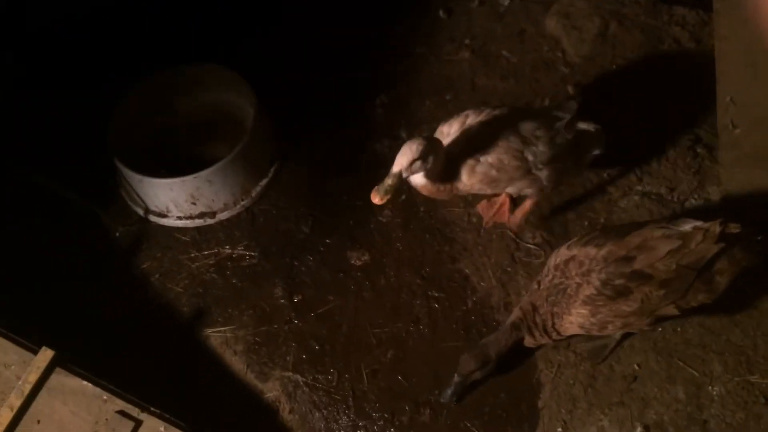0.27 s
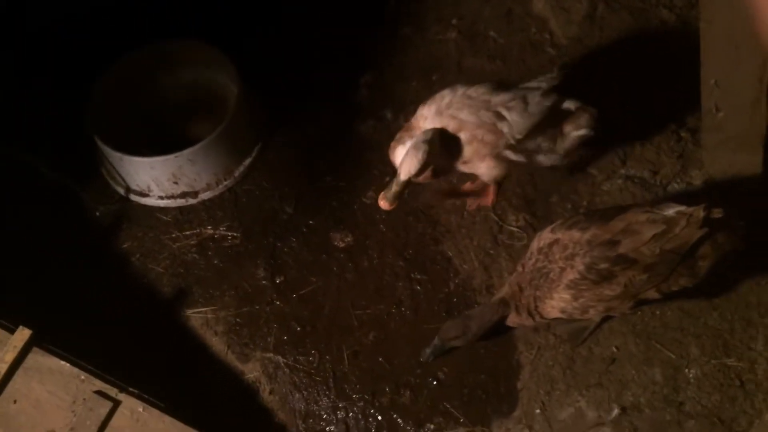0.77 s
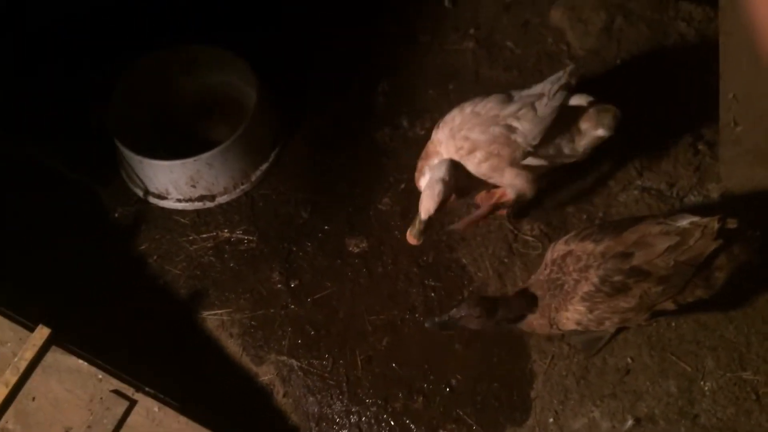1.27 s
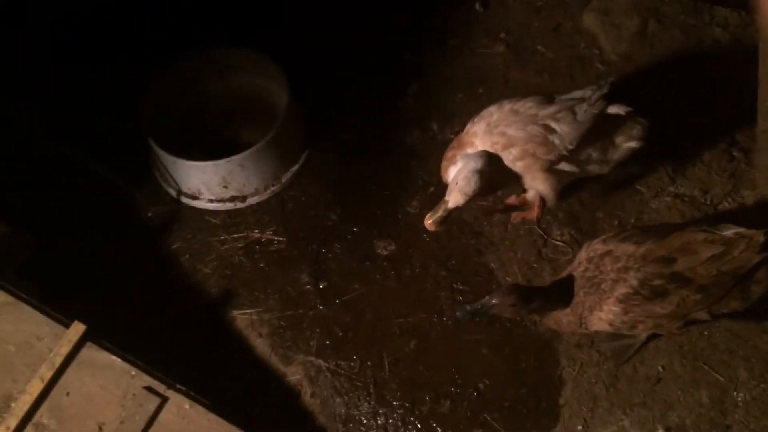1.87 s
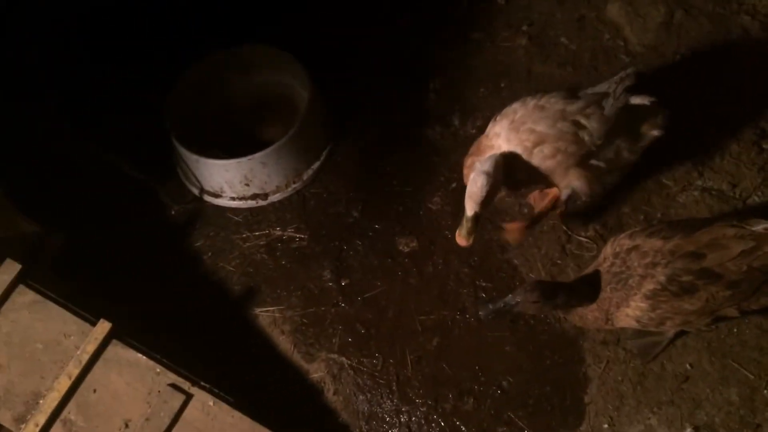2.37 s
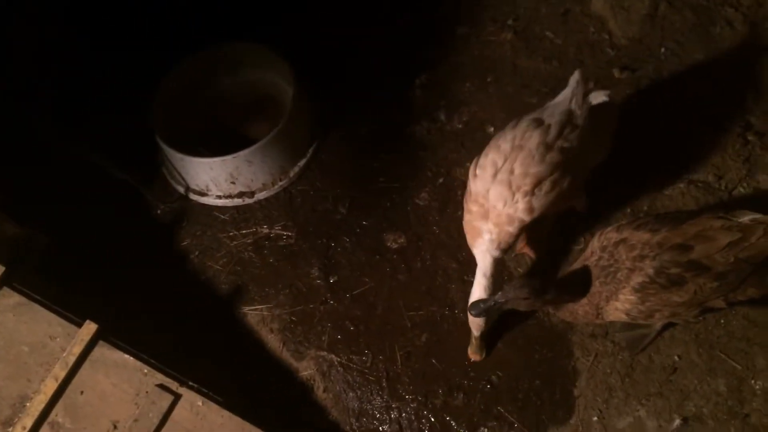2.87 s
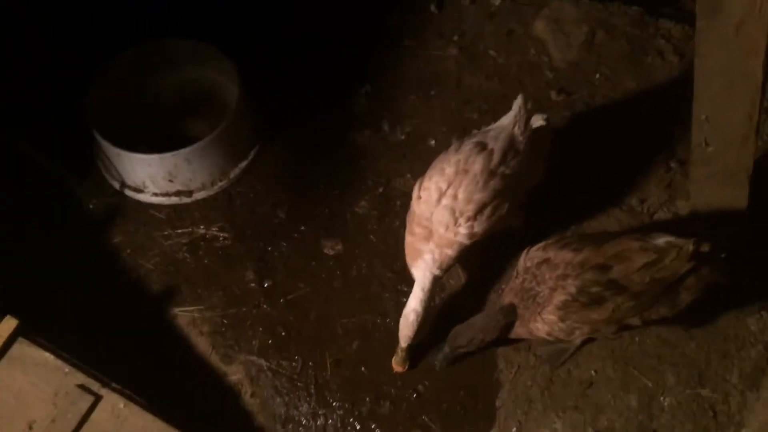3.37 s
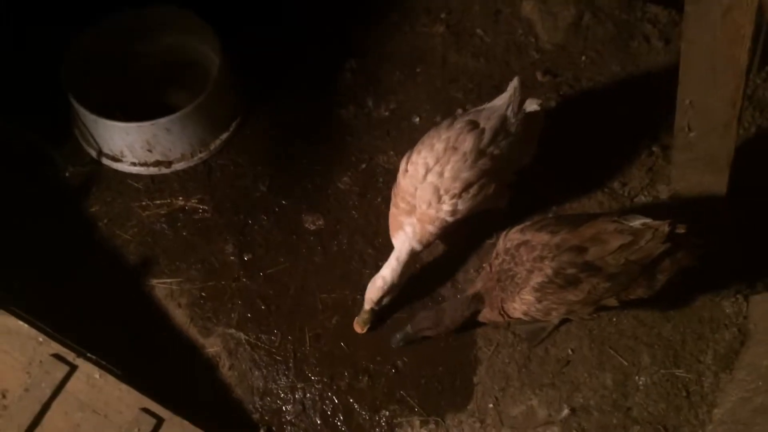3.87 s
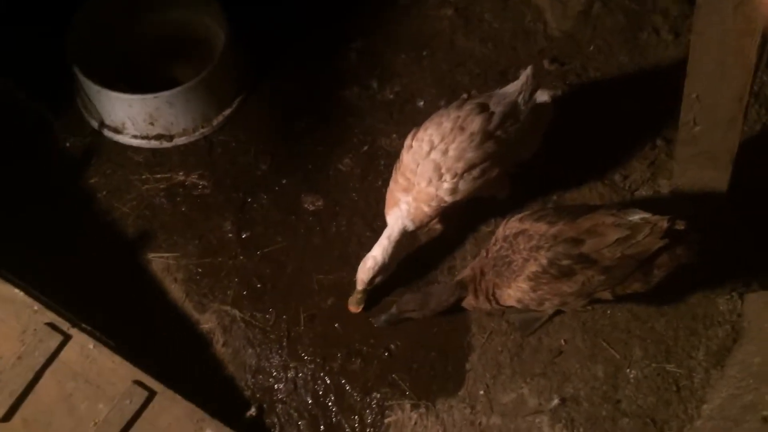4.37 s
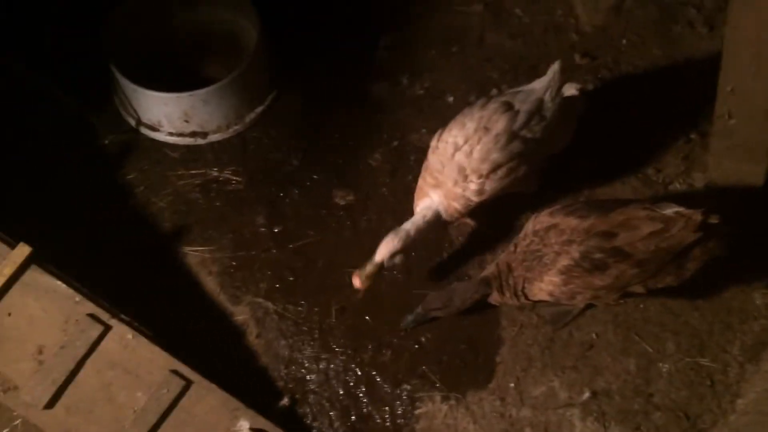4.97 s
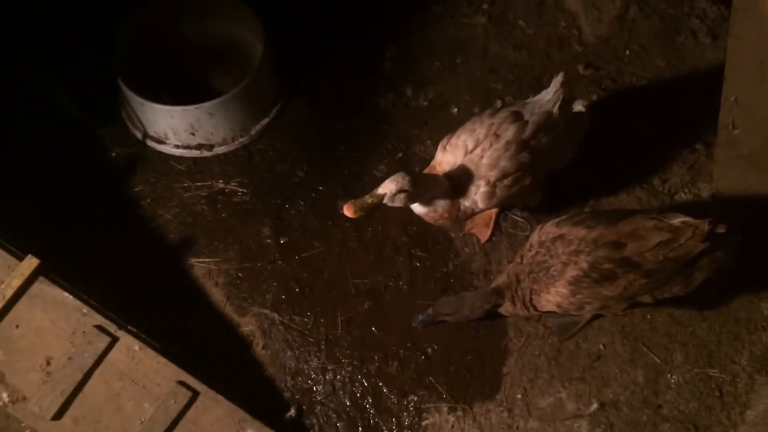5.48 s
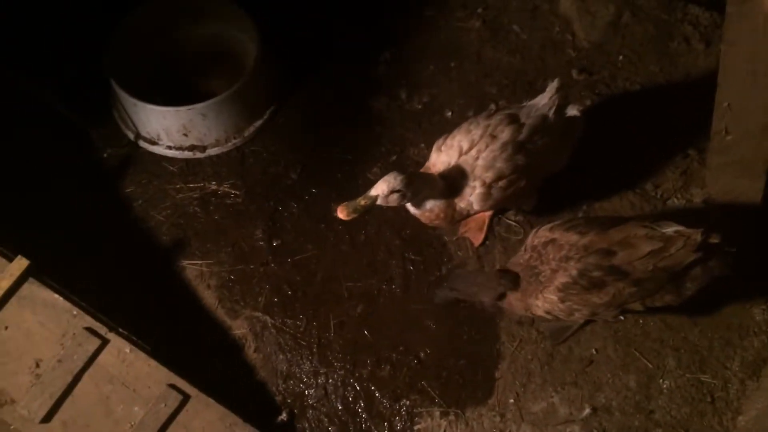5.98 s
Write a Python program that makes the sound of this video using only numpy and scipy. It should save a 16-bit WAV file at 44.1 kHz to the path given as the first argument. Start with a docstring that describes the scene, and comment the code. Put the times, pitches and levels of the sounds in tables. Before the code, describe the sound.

Quick wet bill clicks and fizzing water, a lull with two knocking duck clucks and faint whines, then louder, splashier dabbling.

```python
"""Coop floor at night: two ducks dabble in a shallow puddle.
Bills pop, snap and spray as decaying bursts; sips are narrow hisses with a rising whistle.
Stirred water is a crowd of tiny bubbles, louder the harder it is stirred.
Between two bouts: low clucks and a low plop or footstep from ringing modes, and thin gliding whines.
Background: shaped noise for rumble and hiss, plus wavering sine lines for a quiet hum."""
import sys
import numpy as np
from scipy import signal
from scipy.fft import rfft, irfft
from scipy.io import wavfile
from scipy.ndimage import map_coordinates

SR = 44100
rng = np.random.default_rng(int(sys.argv[2]) if len(sys.argv) > 2 else 0)


def file_out(sig):
    """Save sig as 16-bit WAV at sys.argv[1]."""
    # one column per channel
    cols = np.atleast_2d(sig).T
    # limit, then scale
    lim = np.clip(cols, -1, 1)
    pcm = np.round(lim * 32767).astype(np.int16)
    wavfile.write(sys.argv[1], SR, pcm)


N = 275170

# clear bill clicks in water: start_s, pop_hz, pop_db, snap_db, spray_db
BILL_CLICKS = [(0.0762, 2020, -66, -50, -58), (0.1445, 1690, -54, -63, -64),
               (0.3759, 2450, -52, -58.5, -51), (0.459, 1950, -53.5, -78, -52.5),
               (0.5354, 2640, -43, -52, -62), (0.6235, 2200, -40.5, -67, -69),
               (0.7209, 1790, -56.5, -55.5, -56), (0.7458, 1970, -39.5, -63, -63),
               (0.7824, 1080, -47, -52.5, -56), (0.7954, 2300, -35.5, -73, -73),
               (0.8226, 1920, -48, -71, -53), (0.9107, 2330, -36.5, -44.5, -54),
               (0.9647, 1920, -48, -50, -55), (0.9763, 2330, -49, -70, -70),
               (0.9976, 2200, -41.5, -61, -55), (1.0309, 1250, -52, -60, -61),
               (1.0365, 2610, -43, -69, -64), (1.0604, 2240, -46, -66, -70),
               (1.0778, 1750, -39, -47.5, -77), (1.1197, 1920, -46, -62, -60),
               (1.1403, 2420, -66, -47, -83), (1.176, 2680, -53, -53, -51), (1.215, 2270, -58, -56, -58),
               (1.8817, 2440, -59, -56, -51), (2.028, 2380, -58.5, -69, -56),
               (2.4724, 1690, -60, -69, -56.5), (3.1387, 1310, -62, -54.5, -78),
               (3.4387, 2730, -56.5, -65, -65), (3.596, 2120, -49, -57.5, -82),
               (3.784, 2600, -54, -60, -63), (3.8014, 1690, -53, -59, -73), (3.881, 2050, -51, -59, -82),
               (3.9676, 2450, -49, -52.5, -89), (4.0398, 2000, -46.5, -52.5, -74),
               (4.128, 2480, -38.5, -36.5, -41.5), (4.1525, 2230, -42.5, -48.5, -66),
               (4.1866, 2200, -45, -44, -68), (4.213, 2430, -46.5, -58, -73), (4.2194, 2240, -44, -53, -69),
               (4.2263, 2210, -58, -52.5, -45), (4.2613, 2500, -43.5, -52, -65),
               (4.2956, 2360, -44.5, -58, -58), (4.3612, 2220, -32, -46, -62),
               (4.3922, 2490, -40, -60, -43), (4.457, 2050, -42, -53.5, -53),
               (4.531, 2480, -43.5, -42, -55), (4.5944, 2000, -39.5, -54.5, -60),
               (4.662, 1810, -40.5, -43.5, -46.5), (4.694, 1450, -51, -56, -74),
               (4.7268, 2620, -46, -54, -46), (4.7873, 1650, -34.5, -40, -55),
               (4.8162, 1510, -37, -67, -74), (4.8252, 1780, -39.5, -68, -51),
               (4.8582, 2750, -43, -70, -75), (4.887, 2080, -37, -53, -44.5),
               (4.918, 2600, -52, -53.5, -58), (4.9747, 2380, -42.5, -65, -49),
               (5.0116, 1830, -32.5, -54, -49), (5.0343, 1620, -43.5, -39.5, -38.5),
               (5.0908, 2250, -32.5, -50, -76), (5.117, 1300, -36, -55, -46),
               (5.1381, 1350, -37.5, -51, -39), (5.143, 2090, -36.5, -43.5, -75),
               (5.1808, 2900, -40, -46, -37), (5.2323, 2650, -52, -49.5, -65),
               (5.2552, 1400, -44, -54, -46), (5.3183, 2000, -53.5, -44.5, -43),
               (5.3765, 2280, -59, -44, -45), (5.4268, 1790, -43.5, -69, -42),
               (5.4321, 2430, -37.5, -46, -73), (5.4817, 1700, -35.5, -66, -61),
               (5.4871, 2330, -41.5, -43, -30), (5.5434, 1840, -45, -41.5, -45.5),
               (5.5978, 1450, -32.5, -76, -69), (5.671, 1830, -69, -62, -56),
               (5.749, 1920, -52, -61, -58.5), (5.8376, 1910, -48.5, -78, -76),
               (5.8632, 2080, -53, -74, -54)]
# water squeezed through the bill: start_s, resonance_hz, level_db (before sip trim)
BILL_SIPS = [(0.051, 2070, -61), (0.953, 1320, -52), (1.029, 1200, -51), (1.082, 4340, -48),
             (1.272, 2290, -59.5), (1.479, 2610, -57.5), (1.591, 2410, -54.5), (1.819, 2310, -58.5),
             (1.957, 2326, -56), (2.104, 2420, -59), (2.244, 2470, -66), (2.506, 2410, -60),
             (2.873, 3170, -61), (3.065, 2550, -59), (3.278, 2620, -55.5), (3.508, 2160, -55),
             (3.582, 1895, -48.5), (4.051, 2970, -52), (4.051, 4500, -55), (4.105, 2180, -58),
             (4.262, 4650, -50.5), (5.572, 1930, -50), (5.709, 2054, -48.5), (6.001, 2630, -48.5)]
# clucking pulses, and last a low plop or footstep played by the same ringing modes:
# start_s, upper_hz, upper_db, upper_t60_s, lower_hz, lower_db (upper: throat, lower: chest in a cluck)
CLUCKS_AND_PLOP = [(2.3701, 1440, -21, 0.0057, 200, -37), (2.3751, 1290, -34.5, 0.016, 188, -38),
                   (2.9208, 1213, -18, 0.015, 267, -28.5), (2.9282, 1230, -17, 0.012, 262, -33.5),
                   (3.6318, 666, -34, 0.0083, 302, -52)]
# whining calls, one curve each: time_s, pitch_hz, level_db, harshness_db
WHINE_CURVES = [
    [(2.525, 670, -57, 7), (2.547, 833, -51, 5), (2.585, 668, -64, -4)],
    [(3.05, 1020, -60, 9), (3.075, 1130, -49.5, -9), (3.115, 904, -60.5, 0), (3.14, 891, -63, -1),
     (3.155, 736, -49.5, -9), (3.18, 804, -48, -10), (3.205, 730, -44, -12), (3.225, 860, -53.5, 4),
     (3.255, 598, -61.5, 10), (3.28, 727, -46, 3), (3.297, 860, -56.5, 8)],
    [(3.058, 1276, -58, -2), (3.082, 1317, -56, -12), (3.135, 1150, -61, 1)],
]
# whine overtones: pitch_multiple, relative_db (before harshness)
WHINE_OVERTONES = [(2, -22), (3, -27), (4, -25)]
# how hard the puddle is stirred: time_s, level_db (reference for nibbles, slosh and fizz)
STIRRING_CURVE = [(0.0, -62.5), (0.52, -67), (0.8, -65.5), (0.97, -58), (1.22, -68), (2.64, -72.5),
                  (3.93, -61), (4.24, -58), (4.57, -58), (5.04, -55.5), (5.13, -51), (5.23, -58),
                  (5.53, -60), (5.67, -59.5), (5.98, -66.5), (6.24, -67)]
# breaking film spectrum: freq_hz, shape_db
SNAP_SPECTRUM = [(1500, -36), (3000, 2), (4500, 5.5), (6000, 6.5), (7200, 15), (9000, -4), (16000, -36)]
# droplet spray spectrum: freq_hz, shape_db
SPRAY_SPECTRUM = [(3000, -70), (7000, -1.5), (9000, 2.5), (11000, -3), (13500, 1), (15200, -3),
                  (16500, 6.5)]
# background rumble and hiss spectrum: freq_hz, shape_db
AIR_SPECTRUM = [(13, -47), (22, -22), (64, 1.5), (90, -2), (165, -8), (211, -10.5), (319, -12.5),
                (750, -18.5), (1230, -18.5), (2320, -31.5), (3810, -42.5), (5610, -36), (8260, -38.5),
                (14700, -37), (16000, -35.5)]
# hum strength: time_s, level_db (before hum trim)
HUM_CURVE = [(0.0, -63.5), (1.25, -60.5), (1.65, -54), (2.5, -65.5), (3.38, -53.5), (3.62, -68.5),
             (5.15, -58.5), (6.24, -63.5)]
# hum lines: freq_hz, relative_db
HUM_TONES = [(85.3, 4), (104.6, -1.5), (63.5, -23)]
# decay of the coop's short answer: freq_hz, t60_s
COOP_DECAY = [(200, 0.14), (1500, 0.059), (5000, 0.053), (14000, 0.029)]
# upper modes, a cluck's throat: upper_pitch_multiple, relative_db
UPPER_MODES = [(1, 2.5), (1.58, -13.5), (1.95, -23.5), (.72, -22), (.44, -10)]
# lower modes, a cluck's chest: lower_pitch_multiple, relative_db
LOWER_MODES = [(.66, -4.5), (1, -2), (1.5, -6.5)]
# rasp spectrum: freq_hz, shape_db
RASP_SPECTRUM = [(900, -17), (1500, 6), (2600, 6), (3200, -20), (4200, -11.5), (9000, -27)]
# wet bill resonance: freq_hz, shape_db
BILL_RESONANCE = [(400, -11.5), (900, -6), (1400, -1.5), (2400, -3), (3300, -14.5), (5000, -22),
                  (9000, -19.5)]
# froth spectrum: freq_hz, shape_db
FROTH_SPECTRUM = [(1500, -25), (3000, -1), (4300, -7.5), (6200, 0.5), (8000, -2), (11000, -14),
                  (15500, -1.5)]

LOW_CUT_HZ, TOP_HZ = 38, 16000
# snap pitch at equal spray and pop levels; relatively louder spray snaps higher
SNAP_HZ, SNAP_DB_PER_OCTAVE = 5800, 78
NIBBLES_PER_S, NIBBLE_SCATTER_BEATS = 15, .3
NIBBLE_HZ, NIBBLE_SPREAD_OCTAVES = 2110, 0.21
# relative to the stirring level
NIBBLE_POP_DB, NIBBLE_SNAP_DB, NIBBLE_SPRAY_DB, NIBBLE_SPREAD_DB = 6, -2.5, -0.5, 3
WHINE_JITTER_RATIO = .005
WHINE_FADE_DB_PER_S = 1100  # swell before a call's curve, decay after it
FIZZ_DB, FIZZ_DB_PER_STIR_DB = -70, 0.59  # level at average stirring, and its growth
CLUMP_DB, CLUMPS_PER_S = 2, 35  # water moves in quick uneven gulps


def clicks(cycles=0.49, snap_s=0.00085, snap_width_hz=900, spray_s=0.0015, grit=0.16,
           lead_db=-19, lead_s=0.0061):
    """A pocket of water pops in the bill for a few cycles; the breaking film snaps and sprays."""
    out, t = np.zeros(N), np.arange(SR // 80) / SR
    rise = 1 - np.exp(-t / .00018)

    def level_start(x):
        """Rms 1 over the first 4.5 ms."""
        return x / np.sqrt(np.mean(x[:SR // 220] ** 2))

    def burst(noise, life_s):
        """Noise with fast rise and exponential decay."""
        return level_start(noise * np.exp(-t / life_s) * rise)

    def white():
        """White noise, one click long."""
        return rng.standard_normal(len(t))

    for s, hz, pop_db, snap_db, spray_db in list(BILL_CLICKS) + nibbles():
        snap_hz = SNAP_HZ * 2 ** ((spray_db - pop_db) / SNAP_DB_PER_OCTAVE)
        u = t * hz / (cycles * np.exp(0.21 * rng.standard_normal()))
        pop = level_start(u ** 2 * np.exp(-u) * np.sin(2 * np.pi * hz * t))
        bill_grit = grit * burst(coloured(white(), BILL_RESONANCE), life_s=0.0039)
        pop = amp(pop_db) * level_start(pop + bill_grit)
        film_noise = coloured(ringing_noise(t, snap_hz, snap_width_hz), SNAP_SPECTRUM)
        film = amp(snap_db) * burst(film_noise, snap_s)
        # cubing leaves a few separate droplets
        spray = amp(spray_db) * burst(coloured(white() ** 3, SPRAY_SPECTRUM), spray_s)
        add(out, s - .0002, in_coop(pop, wet_db=-7.0))
        add(out, s, in_coop(film + spray, wet_db=-8.0))
        # closing bill squeezes water out just before the pop
        squeeze = amp(pop_db) * ringing_noise(t, hz, width_hz=660)
        squeeze += amp(snap_db - 14) * coloured(white(), SNAP_SPECTRUM)
        squeeze += amp(spray_db) * coloured(white(), SPRAY_SPECTRUM)
        build_up = (np.exp(-t / lead_s) * rise)[::-1]
        add(out, s - t[-1], amp(lead_db) * squeeze * build_up)
    return out


def nibbles():
    """Faint clicks of steadily working bills, levels following the stirring; columns as BILL_CLICKS."""
    beats = np.arange(int(NIBBLES_PER_S * N / SR))
    late, pitch, pop, snap, spray = np.clip(rng.standard_normal((len(beats), 5)), -2, 2).T
    s = (beats + .5 + NIBBLE_SCATTER_BEATS * late) / NIBBLES_PER_S
    stir_db = np.interp(s, *np.transpose(STIRRING_CURVE))
    pop_hz = NIBBLE_HZ * 2 ** (NIBBLE_SPREAD_OCTAVES * pitch)
    pop_db = stir_db + NIBBLE_POP_DB + NIBBLE_SPREAD_DB * pop
    snap_db = stir_db + NIBBLE_SNAP_DB + NIBBLE_SPREAD_DB * snap
    spray_db = stir_db + NIBBLE_SPRAY_DB + NIBBLE_SPREAD_DB * spray
    return list(zip(s, pop_hz, pop_db, snap_db, spray_db))


def sips(length_s=0.0047, width_hz=200, tone_db=-1, glide_hz_per_s=9000, trim_db=-0.5):
    """Short narrow hisses of water pressed through the bill's combs, each with a small rising whistle."""
    out, t = np.zeros(N), np.arange(-SR // 30, SR // 30) / SR
    swell = np.exp(-.5 * (t / length_s) ** 2)
    for s, hz, db in BILL_SIPS:
        noise = ringing_noise(t, hz, width_hz)
        whistle = np.sqrt(2) * np.sin(2 * np.pi * (hz + .5 * glide_hz_per_s * t) * t)
        hiss = (noise + amp(tone_db) * whistle) * swell
        hiss *= np.linalg.norm(swell) / np.linalg.norm(hiss)
        add(out, s + t[0], in_coop(amp(db + trim_db) * hiss, wet_db=-10))
    return out


def puddle(slosh_gain_db=-3.0):
    """Stirred water crackles in clumps: larger bubbles blip and ring, smaller fizz and tick, froth hisses."""
    stir_db, = curves(STIRRING_CURVE)
    stir_db = stir_db + CLUMP_DB * wobble(CLUMPS_PER_S)
    slosh_db = stir_db + slosh_gain_db
    fizz_db = FIZZ_DB + FIZZ_DB_PER_STIR_DB * (stir_db - stir_db.mean())
    blips = bubbles(rate_per_s=330, centre_hz=1950, spread=.25, cycles=1, spread_db=4)
    plips = bubbles(rate_per_s=45, centre_hz=2150, spread=.18, cycles=3.5, spread_db=3)
    slosh = .65 * blips + .55 * plips + .55 * crackle(rate_per_s=220, spread_db=5)
    fizz = bubbles(rate_per_s=230, centre_hz=5100, spread=.22, cycles=1.5, spread_db=5)
    ticks = bubbles(rate_per_s=80, centre_hz=10000, spread=.25, cycles=.6, spread_db=6)
    froth = coloured(rng.standard_normal(N), FROTH_SPECTRUM) * amp(2.5 * wobble(60))
    fine = .65 * fizz + .55 * ticks + .45 * froth
    return in_coop(amp(slosh_db) * slosh + amp(fizz_db) * fine, wet_db=-6.0)[:N]


def bubbles(rate_per_s, centre_hz, spread, cycles, spread_db):
    """Tiny bursting bubbles at random moments, each with its own pitch, life and size; rms 1."""
    start, draws = rng.random(4000), np.clip(rng.standard_normal((4000, 3)), -2, 2)
    n = int(np.clip(rate_per_s * N / SR, 1, len(start)))
    pitch, life, size = draws[:n].T[:, :, None]
    k = np.arange(SR // 90)
    turns = np.minimum(centre_hz * np.exp(spread * pitch), SR / 2) * k / SR
    u = turns / (cycles * np.exp(.4 * life))
    grains = amp(spread_db * size) * u * np.exp(-u) * np.sin(2 * np.pi * turns)
    where = (start[:n, None] * N).astype(int) + k
    return unit(np.bincount(where.ravel(), grains.ravel(), N)[:N])


def crackle(rate_per_s, spread_db):
    """Random tiny impacts of uneven size, ringing in the wet bill; rms 1."""
    chance, size = rng.random(N), rng.standard_normal(N)
    gain = amp(spread_db * np.clip(size, -2, 2))
    impacts = (chance < rate_per_s / SR) * gain * rng.choice([-1, 1], N)
    return coloured(impacts, BILL_RESONANCE)


def clucks_and_plop(lower_t60_s=0.026, onset_s=0.00084, rasp_db=-20):
    """Clucks ring throat (upper) and chest (lower) modes; a low plop or footstep rings the same modes."""
    out, t = np.zeros(N), np.arange(SR // 15) / SR
    onset = 1 - np.exp(-t / onset_s)

    def ring(hz, t60_s):
        """One decaying mode."""
        return np.sin(2 * np.pi * hz * t) * amp(-60 * t / t60_s) * onset

    for s, hz, db, t60_s, lower_hz, lower_db in CLUCKS_AND_PLOP:
        upper = sum(amp(level) * ring(k * hz, t60_s) for k, level in UPPER_MODES)
        lower = sum((-1) ** i * amp(level) * ring(k * lower_hz, lower_t60_s)
                    for i, (k, level) in enumerate(LOWER_MODES))
        rasp_noise = coloured(rng.standard_normal(len(t)), RASP_SPECTRUM)
        rasp = amp(rasp_db - 60 * t / t60_s) * onset * rasp_noise
        add(out, s, in_coop(amp(db) * (upper + rasp) + amp(lower_db) * lower, wet_db=-11))
    return out


def whines(rasp_db=-22):
    """Thin gliding calls; harshness adds overtones and pitch-pulsed rasp; calls may overlap."""
    out, t = np.zeros(N), np.arange(N) / SR
    for call in WHINE_CURVES:
        hz, db, harsh_db = curves(call)
        phase = 2 * np.pi * np.cumsum(hz * (1 + WHINE_JITTER_RATIO * wobble(200))) / SR
        overtones = sum(amp(level) * np.sin(round(k) * phase) for k, level in WHINE_OVERTONES)
        rasp = amp(rasp_db) * coloured(rng.standard_normal(N), RASP_SPECTRUM) * (1 + np.cos(phase))
        tone = np.sqrt(2) * (np.sin(phase) + amp(harsh_db) * (overtones + rasp))
        outside_s = np.abs(t - np.clip(t, call[0][0], call[-1][0]))
        out += tone * amp(db + 0.64 * wobble(120) - WHINE_FADE_DB_PER_S * outside_s)
    return in_coop(out, wet_db=-15)[:N]


def night(air_db=-60.5, hum_trim_db=-8.0):
    """Steady rumble and hiss from shaped noise; hum from sines wavering in level and phase."""
    air = amp(air_db) * coloured(rng.standard_normal(N), AIR_SPECTRUM)
    t = np.arange(N) / SR
    hum = sum(amp(db + 0.75 * wobble(2.8)) * np.sin(2 * np.pi * hz * t + 0.55 * wobble(4))
              for hz, db in HUM_TONES)
    return air + amp(curves(HUM_CURVE)[0] + hum_trim_db) * hum


def in_coop(x, wet_db):
    """Sound plus a short noise tail for floor and walls, drawn anew on every call."""
    hz, t, z = signal.stft(rng.standard_normal(SR // 6), SR, nperseg=128)
    decay = amp(-60 * t / along(COOP_DECAY, hz)[:, None])
    tail = signal.istft(z * decay, SR, nperseg=128)[1]
    # tail starts 2 ms after the direct sound
    response = np.pad(tail / np.linalg.norm(tail) * amp(wet_db), (SR // 500, 0))
    response[0] = 1
    return signal.fftconvolve(x, response)


def ringing_noise(t, hz, width_hz):
    """Noise in one resonance, at rms 1."""
    f = np.fft.rfftfreq(len(t), 1 / SR)
    resonance = 1 + ((f - hz) / width_hz) ** 2
    return unit(irfft(rfft(rng.standard_normal(len(t))) / resonance, len(t)))


def coloured(x, spectrum):
    """x shaped by (freq_hz, shape_db) points, at rms 1."""
    gain = amp(along(spectrum, np.fft.rfftfreq(len(x), 1 / SR)))
    return unit(irfft(rfft(x) * gain, len(x)))


def wobble(knots_per_s):
    """A smooth random curve through normal draws."""
    knots = rng.standard_normal(int(N * knots_per_s / SR) + 4)
    return map_coordinates(knots, [np.arange(N) * knots_per_s / SR])


def curves(rows):
    """One value per sample for each column after the time."""
    s, *cols = np.transpose(rows)
    return [np.interp(np.arange(N) / SR, s, c) for c in cols]


def along(points, hz):
    """Interpolate (freq_hz, value) points on a log frequency axis."""
    f, v = np.transpose(points)
    return np.interp(np.log(hz + 1), np.log(f + 1), v)


def amp(db):
    """Decibels to gain."""
    return 10 ** (np.asarray(db) / 20)


def unit(x):
    """x at rms 1."""
    return x / np.sqrt(np.mean(x ** 2) + 1e-20)


def add(track, s, sound):
    """Mix a sound into the track at time s."""
    i = int(np.clip(round(s * SR), 0, N))
    track[i:i + len(sound)] += sound[:N - i]


def scene():
    """Sum of all layers, one channel."""
    return (clicks() + sips() + puddle() + clucks_and_plop() + whines() + night())[None]


def record(dry):
    """Thin the lowest bass; keep nothing from the band limit up."""
    hz = np.fft.rfftfreq(N, 1 / SR)
    low_cut = hz ** 2 / np.sqrt(hz ** 4 + LOW_CUT_HZ ** 4)
    return irfft(rfft(dry) * low_cut * (hz < TOP_HZ), N)


dry = scene()
out = record(dry)
file_out(out)
```